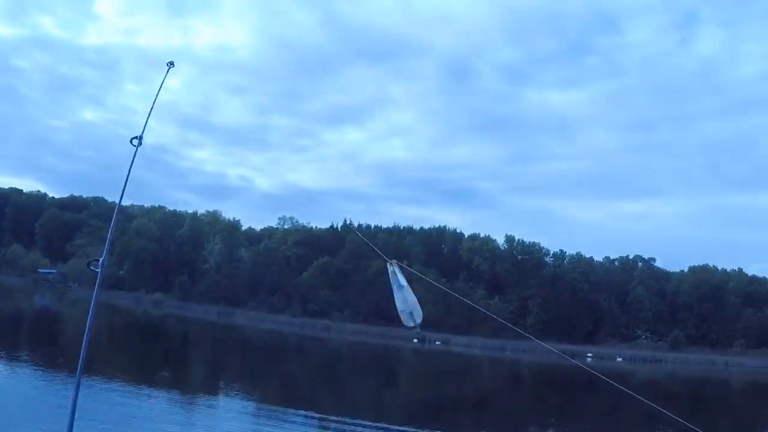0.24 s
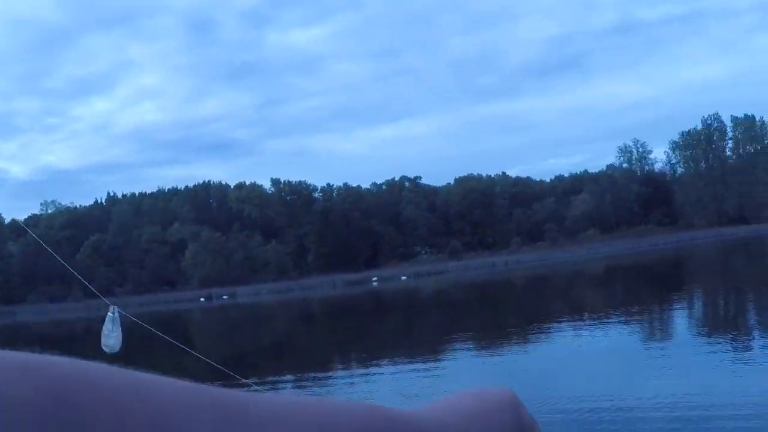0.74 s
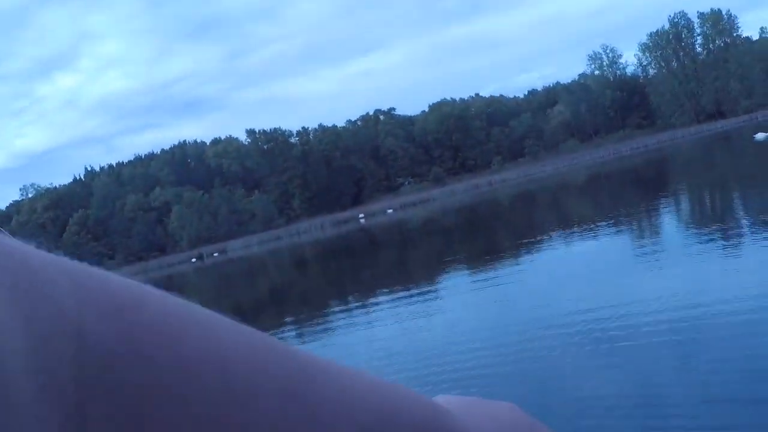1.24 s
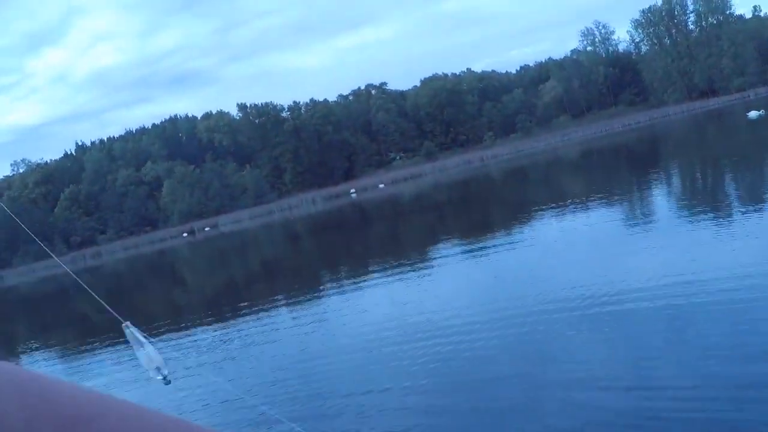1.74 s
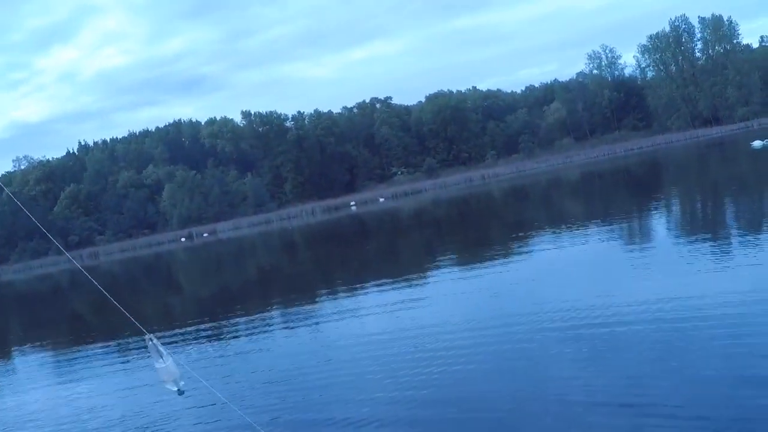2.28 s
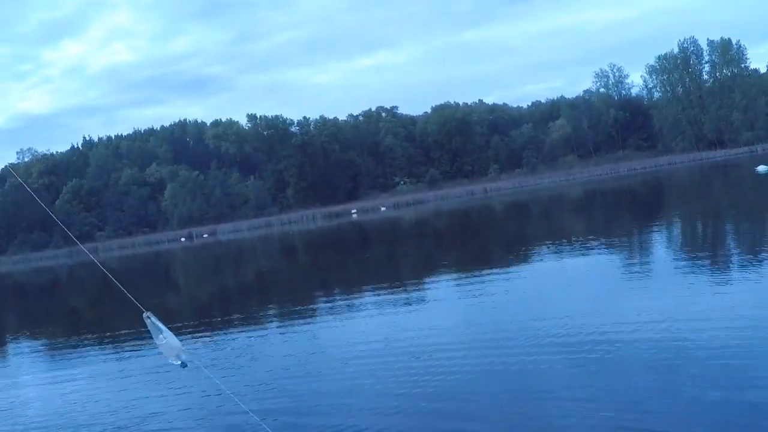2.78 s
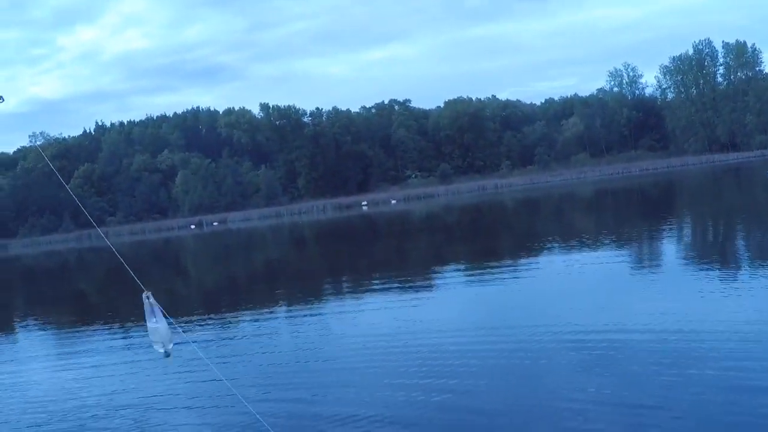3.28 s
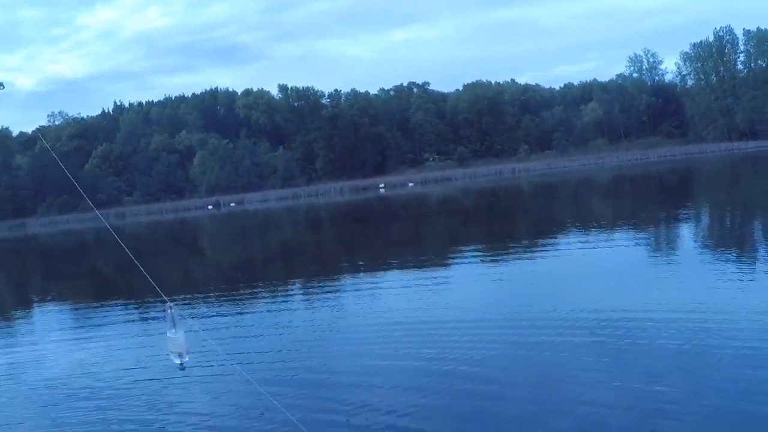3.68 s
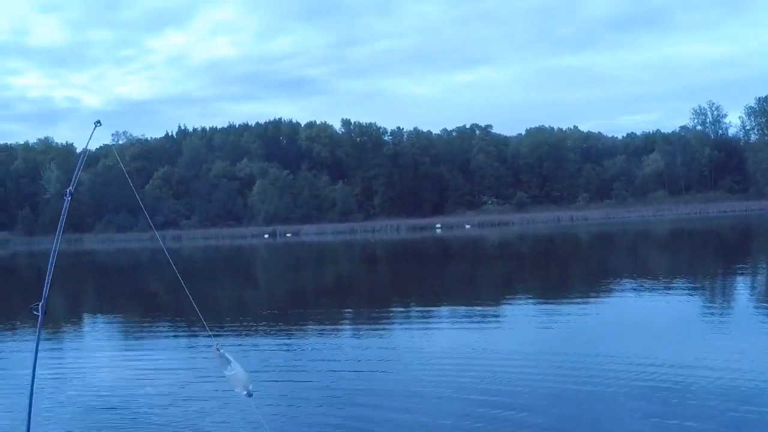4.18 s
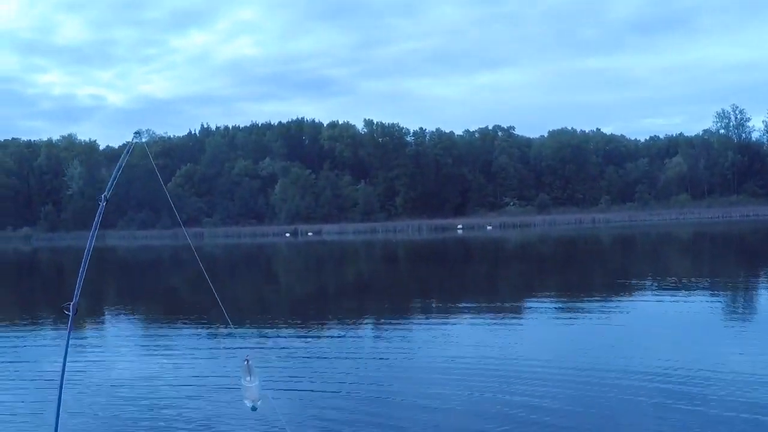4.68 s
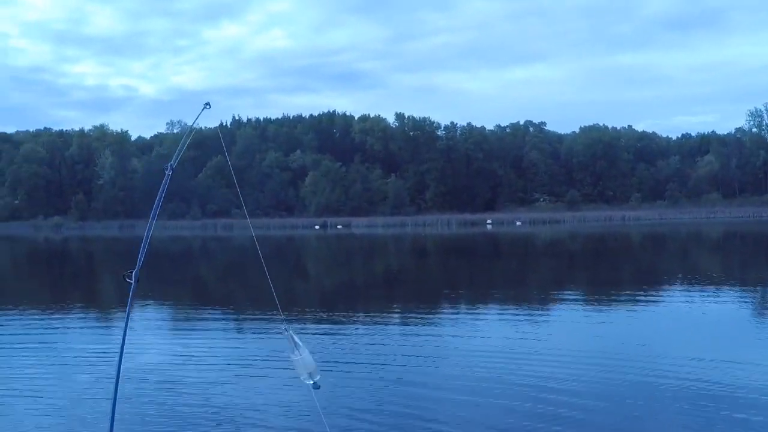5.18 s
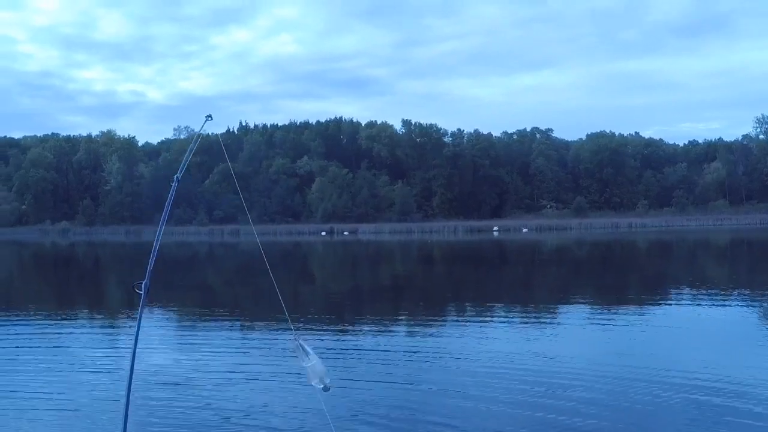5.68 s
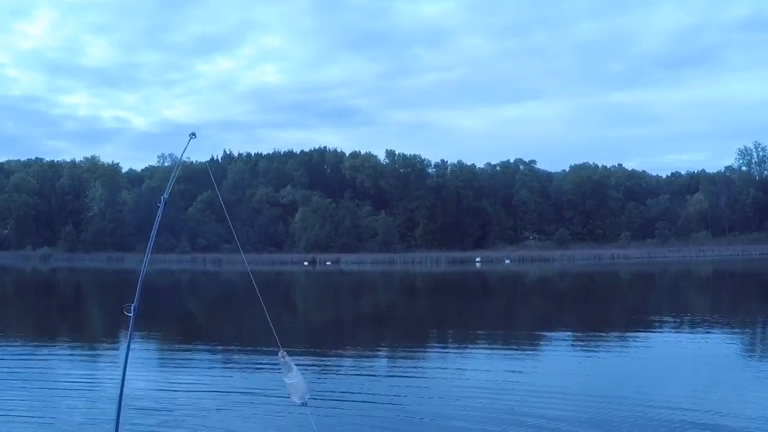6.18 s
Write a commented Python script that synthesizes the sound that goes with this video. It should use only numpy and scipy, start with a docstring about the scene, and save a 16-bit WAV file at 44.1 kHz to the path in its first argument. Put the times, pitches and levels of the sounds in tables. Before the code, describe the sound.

Close handling of fishing tackle: sparse sharp knocks, light clicks and sleeve brushes over uneven rumble, distant birds whistling and trilling with soft echoes.

```python
"""Fishing tackle by a calm lake

Tackle is handled close to a body-worn microphone in a plastic housing. Knocks make the housing's resonances sound,
short pitched rings sound alone or within a knock, and the mount ticks with quick falling tones.
Clothing brushes past as grainy noise, and movement adds low rumble and damped thumps, some under knocks.
Small birds call from the far shore as gliding tones and narrow noise with echoes, over a faint bed of air noise."""
import sys
import numpy as np
from scipy import signal
from scipy.fft import rfft, irfft
from scipy.io import wavfile

SR = 44100
rng = np.random.default_rng(int(sys.argv[2]) if len(sys.argv) > 2 else 0)


def to_wav(s):
    """Save 16-bit WAV."""
    ch = np.atleast_2d(s).T  # columns
    pcm = np.round(np.clip(ch, -1, 1) * 32767)  # PCM
    wavfile.write(sys.argv[1], SR, pcm.astype(np.int16))


N = 283563
TIME = np.arange(N) / SR   # seconds


def from_db(db):
    """Turn decibels into a plain gain."""
    return 10 ** (np.asarray(db) / 20)


def rms_one(x):
    """Scale a sound to an average strength (rms) of 1."""
    return x / np.sqrt(np.mean(x ** 2) + 1e-20)


def level(rows):
    """Join rows of (time_s, level_db) into a gain over time."""
    times_s, levels_db = np.transpose(rows)
    return from_db(np.interp(TIME, times_s, levels_db))


def add(out, start_s, sound):
    """Mix a sound in from its start time."""
    start = int(np.clip(round(start_s * SR), 0, N - 1))
    out[start:start + len(sound)] += sound[:N - start]


def cut(x, hz, kind, order=2):
    """Filter off the treble ("low") or the bass ("high") with a smooth Butterworth slope."""
    hz = np.clip(hz, 10, .45 * SR)
    return signal.sosfilt(signal.butter(order, hz, kind, fs=SR, output="sos"), x)


def colour(x, spectrum):
    """Shape noise with (pitch_hz, level_db) points, nearly silent below the first; rms 1."""
    points_hz, points_db = np.transpose(spectrum)
    bins_hz = np.maximum(np.arange(N // 2 + 1) * SR / N, 1)
    shape_db = np.interp(np.log(bins_hz), np.log(points_hz), points_db, left=-120)
    return rms_one(irfft(rfft(x) * from_db(shape_db), N))


def drift(rate_hz):
    """Wander at random: new values of spread 1 at the given rate, joined by straight lines."""
    knots = rng.standard_normal(2000)
    return np.interp(TIME * rate_hz, np.arange(len(knots)), knots)


def resonate(x, hz, width_hz):
    """Pass a sound through one resonance with gain 1 at its top."""
    r = np.exp(-np.pi * width_hz / SR)
    feed = np.array([1, 0, -1]) * (1 - r * r) / 2
    feedback = [1, -2 * r * np.cos(2 * np.pi * hz / SR), r * r]
    return signal.lfilter(feed, feedback, x + 1e-18)


# damped resonances of the housing: (pitch_hz, width_hz of each of two passes, level_db)
SHELL_RESONANCES = [(189, 190, -4), (656, 180, -11), (825, 380, -14), (1327, 580, -2), (1816, 460, -6),
                    (2186, 220, -6), (2575, 160, -14), (3038, 250, -20), (4430, 330, -18), (5434, 370, -20),
                    (6066, 470, -21), (7144, 450, -24), (10000, 5000, -30)]
# what rings on after a knock: (pitch_hz, level_db, time_to_fade_60_db_s)
AFTER_RINGS = [(607, -32, .07), (755, -42, 0.066), (1119, -30, 0.073), (1437, -51, 0.11), (1884, -31, .2),
               (2650, -21.5, .055)]


def housing(force, ringing):
    """The shell swells and dies within a few ms; a few of its modes ring on."""
    shell = 0
    for k, (hz, width_hz, db) in enumerate(SHELL_RESONANCES):
        mode = resonate(resonate(force, hz, width_hz), hz, width_hz)
        shell = shell + (-1) ** k * from_db(db) * mode   # neighbours move in opposite directions
    t = TIME[:SR // 2]
    tail = sum(from_db(db - 60 * t / t60_s) * np.sin(2 * np.pi * hz * t) for hz, db, t60_s in AFTER_RINGS)
    return shell + signal.fftconvolve(ringing, tail)[:N]


# hard contacts and their bounces, levels before the housing:
# (start_s, level_db, treble_limit_hz, bass_cut_hz, after_ring_db relative to the blow)
KNOCK_BLOWS = [(.6271, -18.5, 2420, 594, -18), (0.6305, -8, 720, 255, 2), (.6424, -22.5, 3370, 400, -3),
               (1.2790, -11, 2500, 2400, 1), (1.2807, -11.5, 2500, 2400, 1), (1.2891, -21.5, 1180, 247, 14),
               (1.2906, -14.5, 1400, 250, -4), (3.4290, -28.5, 1300, 200, -14),
               (3.4355, -12.5, 730, 151, -13), (3.8112, -1, 2700, 60, -5), (3.8127, -3, 2400, 60, -4),
               (3.8625, -32, 4000, 900, -15), (4.2388, -24.5, 1290, 1070, 5), (4.2880, -32, 885, 305, -3),
               (4.5515, -32, 1430, 200, 9), (4.749, -37, 1500, 200, -10)]


def knocks(shiver_db=-48, shiver_s=.012):
    """Soft contacts lose the treble, light ones the bass; loose parts shiver just after the blow."""
    force, ringing, t = np.zeros(N), np.zeros(N), TIME[:SR // 10]
    for start_s, db, treble_hz, bass_hz, ring_db in KNOCK_BLOWS:
        shiver = from_db(shiver_db) * rng.standard_normal(len(t)) * np.exp(-t / shiver_s)
        blow = (t == 0) + shiver   # a single click, then the shiver
        blow = from_db(db) * cut(cut(blow, treble_hz, "low"), bass_hz, "high")
        add(force, start_s, blow)
        add(ringing, start_s, from_db(ring_db) * blow)
    return housing(from_db(30.0) * force, ringing)


# short pitched rings, alone or within a knock:
# (start_s, level_db before overtone and fade, pitch_hz, time_to_fade_60_db_s)
PITCHED_TOCKS = [(.4612, -32, 625, 0.061), (0.765, -35, 1180, 0.035), (1.278, -14.5, 2450, 0.0091),
                 (4.2402, -29, 1160, 0.025), (4.4838, -41.5, 766, 0.042)]


def tocks(overtone=2.26, overtone_db=-11, rise_s=0.00061):
    """A short pitched ring fades evenly in dB, with one faster-dying overtone."""
    out, t = np.zeros(N), TIME[:SR // 10]
    for start_s, db, hz, t60_s in PITCHED_TOCKS:
        fade = np.exp(-np.log(1000) * t / t60_s)
        high_tone = from_db(overtone_db) * fade * np.sin(2 * np.pi * overtone * hz * t)
        tone = np.sin(2 * np.pi * hz * t) + high_tone
        add(out, start_s, from_db(db) * fade * (1 - np.exp(-t / rise_s)) * tone)
    return out


# the mount catching and letting go: (start_s, level_db before fade and shell, starting_pitch_hz)
MOUNT_TICKS = [(0.702, -30, 700), (0.976, -33.5, 1100), (1.0323, -31, 3000), (1.0995, -40.5, 895),
               (1.1496, -30, 3400), (1.2408, -33.5, 1300), (1.3763, -33.5, 900), (1.9167, -35.5, 2800),
               (1.9555, -34, 1100), (2.0609, -38.5, 2200), (2.1185, -39.5, 900), (2.3581, -32, 3040),
               (2.4127, -38, 1100), (2.4735, -38.5, 2700), (2.5003, -37, 1100), (2.5595, -36, 2950),
               (2.61, -36, 1100), (2.768, -37.5, 990), (2.8274, -35.5, 3200), (4.0098, -39.5, 1900),
               (4.0995, -37, 2300), (4.957, -37.5, 1090), (5.0136, -34, 2700), (5.5922, -36.5, 1000),
               (5.6385, -32.5, 3200)]


def ticks(cycles=0.34, fade_s=0.0071, rise_s=.00006, rebound_s=0.0071, rebound_db=-13):
    """Bending waves carry treble faster than bass, so each tick falls in pitch; a faint rebound follows."""
    out, t = np.zeros(N), TIME[:SR // 25]
    for start_s, db, start_hz in MOUNT_TICKS:
        phase = 2 * np.pi * cycles * np.log1p(t * start_hz / cycles)
        swell = np.exp(-(t / fade_s) ** 2) * (1 - np.exp(-t / rise_s))
        tick = from_db(db) * np.sin(phase) * swell
        add(out, start_s, tick)
        add(out, start_s + rebound_s * rng.uniform(0.74, 1.0), from_db(rebound_db) * tick)
    # mainly the sharp ticks reach the shell's clack
    snap = from_db(10.5) * resonate(cut(out, 1640, "high"), 1450, 310)
    return cut(out + snap, 6800, "low")


# single brushes of cloth; the weight both drags on the shell and shoves it, levels before mixing:
# (middle_s, length_s, hiss_db, weight_db)
CLOTH_BRUSHES = [(.105, 0.065, -52.5, -69), (.467, 0.033, -51.5, -45), (1.311, 0.053, -47.5, -49.5),
                 (2.531, 0.013, -46.5, -44.5), (2.682, 0.029, -48, -45.5), (2.883, 0.011, -45, -40),
                 (2.924, 0.016, -40, -53), (2.951, 0.017, -49.5, -42.5), (3.098, 0.022, -38, -41.5),
                 (3.122, 0.0084, -60, -47.5), (3.268, 0.013, -51.5, -45), (3.305, .018, -36, -41),
                 (3.375, 0.029, -43.5, -45.5), (3.426, 0.055, -50, -45), (3.473, 0.016, -37.5, -58),
                 (3.545, 0.034, -45.5, -58), (3.587, 0.025, -36.5, -42.5), (3.657, 0.021, -41, -56),
                 (3.69, 0.041, -39.5, -47), (3.773, 0.043, -44.5, -49), (3.866, .017, -35.5, -41),
                 (4.244, 0.019, -48, -51), (4.489, 0.017, -53, -42), (4.554, 0.014, -46.5, -42.5),
                 (4.741, 0.021, -48.5, -43), (4.835, .015, -54.5, -63), (4.993, 0.0097, -47.5, -38),
                 (5.053, 0.01, -49, -42.5), (5.322, 0.011, -55.5, -57), (5.372, 0.0088, -53, -68),
                 (5.533, 0.0074, -57, -48.5)]
STUTTER_START_S, STUTTER_GAP_S, STUTTER_LENGTH_S = .764, .046, .016
# levels of the first slip, then the loss per slip
STUTTER_HISS_DB, STUTTER_WEIGHT_DB, STUTTER_FADE_DB = -50, -47, .5


def brushes(count=7):
    """Gather the single brushes and a sliding sleeve that sticks and slips evenly, each slip fainter."""
    slips = []
    for k in range(count):
        fade_db = k * STUTTER_FADE_DB
        middle_s = STUTTER_START_S + k * STUTTER_GAP_S
        slips.append((middle_s, STUTTER_LENGTH_S, STUTTER_HISS_DB - fade_db, STUTTER_WEIGHT_DB - fade_db))
    return CLOTH_BRUSHES + slips


# light rubbing between the brushes, before its gain and flutter: (time_s, level_db)
LIGHT_RUBBING = [(0.0, -55), (0.52, -55.5), (1.4, -67.5), (1.84, -61), (2.0, -59), (2.97, -58.5),
                 (3.1, -61.5), (3.31, -64), (3.49, -51), (3.69, -54.5), (3.87, -57.5), (4.15, -54.5),
                 (4.33, -61.5), (5.66, -62), (6.07, -67), (6.43, -69)]
# resonances that the rubbing wakes: (pitch_hz, width_hz, added_level_db)
RUBBING_PEAKS = [(1160, 260, 3), (1980, 120, -8), (2669, 110, 10), (3270, 51, 2), (4350, 200, -10),
                 (5700, 308, -1.5), (7170, 250, 5.5)]
# tone of rubbed cloth: (pitch_hz, relative_level_db_per_hz)
RUBBING_COLOUR = [(100, -14.5), (260, -10), (450, -21.5), (750, -10), (1200, -10), (1700, -10), (2400, -2),
                  (2800, -13), (3050, -16), (4400, -21.5), (4900, -26), (5900, -24), (6600, -40),
                  (15000, -62)]
# dull drag of a firm brush: (pitch_hz, relative_level_db_per_hz)
DRAG_COLOUR = [(70, -1), (140, 3.5), (260, 3.5), (430, -30), (720, -4), (900, -7.5), (1200, -5.5),
               (1600, -16.5), (3000, -43)]
# a sleeve slides past: (time_s, level_db)
SLEEVE_LEVEL = [(0, -62), (.15, -62), (.4, -55.5), (.72, -56), (.9, -61.5), (1.1, -63.5), (1.3, -98)]
# hiss of that sleeve: (pitch_hz, relative_level_db_per_hz)
SLEEVE_COLOUR = [(150, -14), (260, -1.5), (450, -17), (850, 2), (1700, 1), (2600, 1.5), (3500, 4),
                 (4300, -0.5), (5000, -14), (8000, -38)]


def cloth(catches_per_s=1100, smooth=0.62, rubbing_db=-3, flutter_db=5.0, grain_spread_db=2):
    """Fibres catch and slip as dense grains; firm brushes also drag on the shell, and a sleeve hisses."""
    # pressure and drag are powers, so that overlapping strokes add up
    pressure = (level(LIGHT_RUBBING) * from_db(rubbing_db + flutter_db * drift(60))) ** 2
    drag = 0
    for middle_s, length_s, hiss_db, weight_db in brushes():
        distance = np.minimum(np.abs(2 * (TIME - middle_s) / length_s), 6)
        stroke = np.exp(-distance ** 3)
        pressure = pressure + stroke * from_db(hiss_db) ** 2
        drag = drag + stroke * from_db(weight_db) ** 2
    sizes = rng.standard_normal(N) * from_db(grain_spread_db * rng.standard_normal(N))
    catches = rng.random(N) < catches_per_s / SR
    grains = rms_one(catches * sizes) + smooth * rng.standard_normal(N)
    grains = grains + sum(from_db(db) * resonate(grains, hz, width_hz) for hz, width_hz, db in RUBBING_PEAKS)
    hiss = np.sqrt(pressure) * colour(grains, RUBBING_COLOUR)
    dragging = from_db(-2.0) * np.sqrt(drag) * colour(rng.standard_normal(N), DRAG_COLOUR)
    sleeve = level(SLEEVE_LEVEL) * colour(rng.standard_normal(N), SLEEVE_COLOUR)
    return hiss + dragging + sleeve


# low damped thumps, some under knocks: (start_s, level_db before damping, pitch_hz)
LOW_THUMPS = [(.632, -23.5, 142), (.913, -30.5, 35), (1.197, -33, 32.7), (1.503, -30.5, 44.2),
              (2.372, -33.5, 39.5), (2.683, -32, 66.5), (2.952, -30, 55), (3.438, -26.5, 216),
              (3.814, -23.5, 281), (4.554, -28.5, 45), (5.183, -34, 27.7), (5.831, -38.5, 29.4)]
# course of the rumble, before its gain and lurching: (time_s, level_db)
RUMBLE_LEVEL = [(0.0, -49), (0.66, -48.5), (1.4, -47.5), (1.61, -49), (2.78, -50.5), (2.88, -52.5),
                (3.92, -47), (4.32, -51), (5.03, -49), (5.28, -54.5), (5.8, -54.5), (6.43, -59.5)]
# tone of the rumble: (pitch_hz, relative_level_db_per_hz)
RUMBLE_SPECTRUM = [(10, -17), (20, 3), (32, 1.5), (60, -8.5), (100, -15.5), (160, -23), (260, -28.5),
                   (380, -48), (800, -62.5)]
# the rumble swells and sinks at random about its course
RUMBLE_GAIN_DB, LURCH_DB, LURCHES_PER_S = 3.5, 5.5, 11
# the bump under a brush: middle pitch, its scatter, its level over the brush's weight
SHOVE_HZ, SHOVE_SPREAD_OCTAVES, SHOVE_DB = 89, 0.33, 7.5


def body(swell_cycles=0.33):
    """Lumpy rumble of movement and heavily damped bumps, some listed and one more for every brush."""
    lurch = from_db(RUMBLE_GAIN_DB + LURCH_DB * drift(LURCHES_PER_S))
    out = lurch * level(RUMBLE_LEVEL) * colour(rng.standard_normal(N), RUMBLE_SPECTRUM)
    shoves = []
    for middle_s, _, _, weight_db in brushes():
        hz = SHOVE_HZ * 2 ** rng.normal(0, SHOVE_SPREAD_OCTAVES)
        shoves.append((middle_s, weight_db + SHOVE_DB, hz))
    t = TIME[:SR // 5]
    for start_s, db, hz in LOW_THUMPS + shoves:
        age = t * hz / swell_cycles
        add(out, start_s, -from_db(db) * age * np.exp(1 - age) * np.sin(2 * np.pi * hz * t))
    return out


def note(pitch_hz, db, waver=.012, swell=0.91):
    """Sing a slightly wavering tone that swells and fades once; a swell under 1 peaks early."""
    knot_times = TIME[:SR:SR // 250]   # about 250 random pitch nudges per second
    nudges = np.interp(TIME[:len(pitch_hz)], knot_times, rng.standard_normal(len(knot_times)))
    pitch_hz = pitch_hz * (1 + waver * nudges)
    loudness = np.sin(np.pi * np.linspace(0, 1, len(pitch_hz)) ** swell)
    return from_db(db) * loudness * np.sin(2 * np.pi * np.cumsum(pitch_hz) / SR)


# trills of arched chirps that slow down, levels before scatter and echoes:
# (first_chirp_s, end_s, first_gap_s, gap_growth_s per chirp, first_level_db, last_level_db,
#  top_pitch_hz, lean: 0 even arch, 1 only falling)
BIRD_TRILLS = [(3.447, 4.62, .077, .0014, -65, -60.5, 4370, .4),
               (5.711, 6.43, .085, .0033, -57, -52, 4470, 0)]


def trills(chirp_s=0.033, arch_hz=1150, uneven_db=4.0):
    """Chirps arch in pitch; along a trill the gaps widen and the level moves evenly, with random scatter."""
    out, sweep = np.zeros(N), np.linspace(-1, 1, int(chirp_s * SR))
    for first_s, end_s, gap_s, growth_s, first_db, last_db, top_hz, lean in BIRD_TRILLS:
        arch = ((sweep + lean) / (1 + abs(lean))) ** 2
        for k, (bend, loud) in enumerate(rng.uniform(-1, 1, size=(16, 2))):
            middle_s = first_s + k * gap_s + k * k * growth_s / 2
            if middle_s < end_s:
                db = np.interp(middle_s, [first_s, end_s], [first_db, last_db]) + uneven_db * loud
                pitch_hz = top_hz - arch_hz * (1 + 0.201 * bend) * arch
                add(out, middle_s - chirp_s / 2, note(pitch_hz, db, waver=.018, swell=.85))
    return out


# whistles that slide onto a held note, levels before echoes:
# (start_s, length_s, level_db, first_pitch_hz, last_pitch_hz)
BIRD_WHISTLES = [(0, 0.076, -63, 4250, 4340), (.289, 0.083, -64, 4250, 4260),
                 (.547, .092, -61.5, 4260, 4200), (.836, 0.054, -58, 4250, 4030),
                 (1.962, 0.024, -60, 4300, 3700), (3.94, 0.2, -67, 2400, 2170),
                 (4.36, 0.048, -61.5, 4400, 3980), (5.708, 0.18, -54, 2545, 2212),
                 (6.225, 0.31, -65.5, 2560, 2432)]
# hoarse bird notes, levels before echoes:
# (start_s, length_s, level_db, pitch_hz, width_hz of each of two passes)
BIRD_RASPS = [(2.83, .42, -72, 4150, 350), (3.8, 1.2, -73, 4280, 400), (5.28, .1, -68, 3410, 200),
              (5.4, .28, -71, 2850, 160)]
SHORE_T60_S = 0.46   # time for the main echoes to fade by 60 dB


def birds(settle_s=0.0179):
    """Chirps, whistles and rasps cross the water with a wash of echoes from the trees."""
    out = trills()
    for start_s, length_s, db, first_hz, last_hz in BIRD_WHISTLES:
        glide = np.exp(-TIME[:int(length_s * SR)] / settle_s)
        pitch_hz = last_hz + (first_hz - last_hz) * glide
        add(out, start_s, note(pitch_hz, db, waver=0.0055, swell=0.75))
    for start_s, length_s, db, hz, width_hz in BIRD_RASPS:
        rasp = resonate(resonate(rng.standard_normal(SR), hz, width_hz), hz, width_hz)
        rasp = rms_one(rasp)[:int(length_s * SR)]
        add(out, start_s, from_db(db) * rasp * signal.windows.tukey(len(rasp)))
    t = TIME[:SR]
    wood_fade = np.exp(-np.log(1000) * t / SHORE_T60_S)
    twig_fade = 2 * np.exp(-t / 0.015)   # echoes of near twigs die sooner
    trees = rng.standard_normal(SR) * (wood_fade + twig_fade)
    echoes = signal.fftconvolve(out, trees / np.linalg.norm(trees))[:N]
    return from_db(2.5) * out + from_db(-4.0) * echoes


# tone of the background air: (pitch_hz, relative_level_db_per_hz)
AIR_COLOUR = [(59, -44.5), (100, -7), (407, -16.5), (962, -18.5), (1240, -14), (1660, -17), (2420, -13.5),
              (2690, -22), (2990, -21), (4000, -17), (4940, -23.5), (5720, -23.5), (6760, -27),
              (13200, -32), (15000, -31.5)]
AIR_DB = -62.5   # rms level


def air():
    """A steady bed of coloured noise lies behind everything."""
    return from_db(AIR_DB) * colour(rng.standard_normal(N), AIR_COLOUR)


def scene():
    """Add up all sources into one channel."""
    background = air()
    return (knocks() + tocks() + ticks() + cloth() + body() + birds() + background)[None]


CUTOFF_HZ = 15350


def record(dry):
    """Strong peaks are gently rounded and the top is cut steeply."""
    rounded = 1.4 * np.tanh(dry / 1.4)
    return signal.sosfilt(signal.ellip(10, .1, 70, CUTOFF_HZ, fs=SR, output="sos"), rounded)


dry = scene()
out = record(dry)
to_wav(out)
```